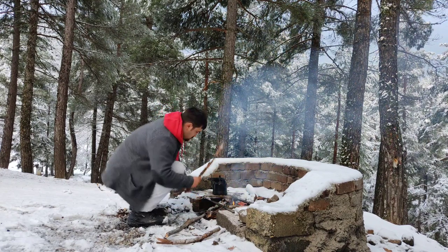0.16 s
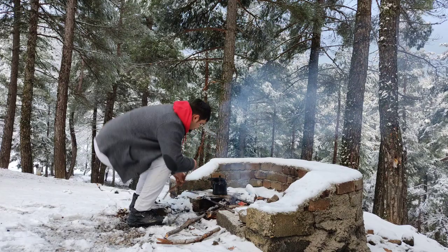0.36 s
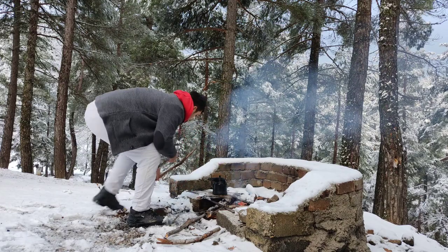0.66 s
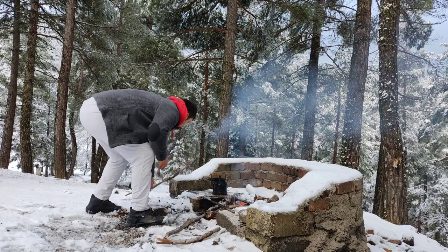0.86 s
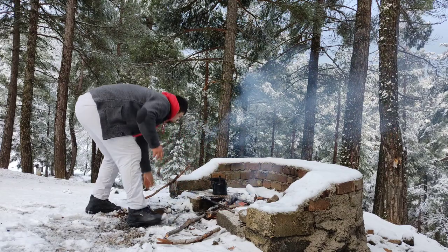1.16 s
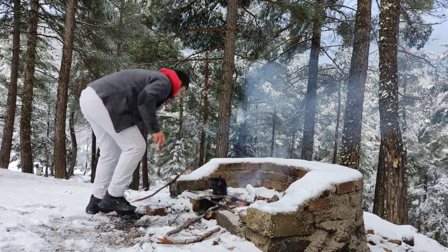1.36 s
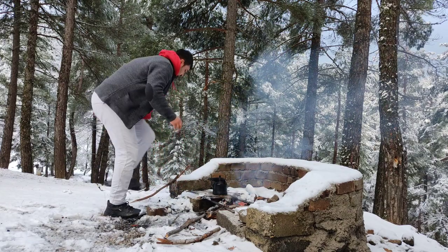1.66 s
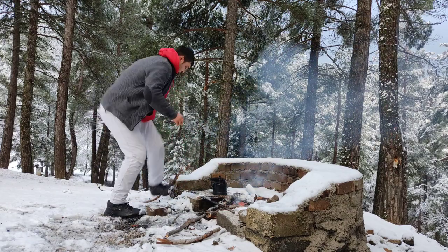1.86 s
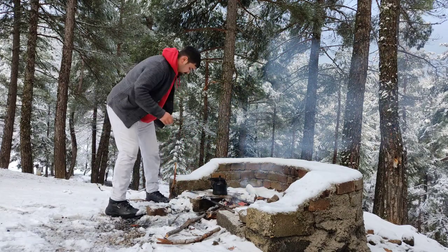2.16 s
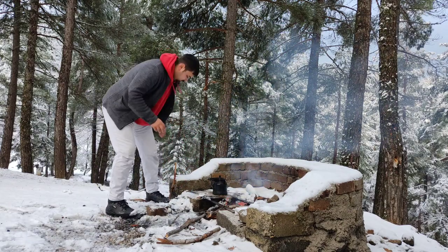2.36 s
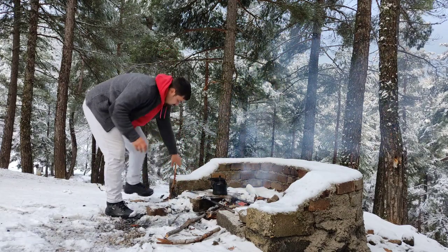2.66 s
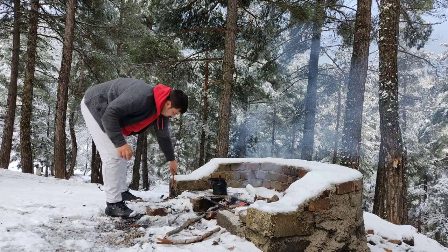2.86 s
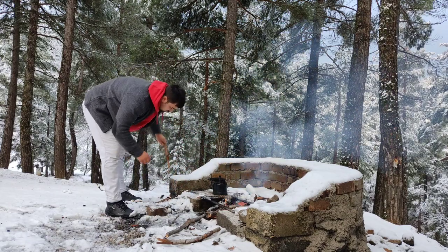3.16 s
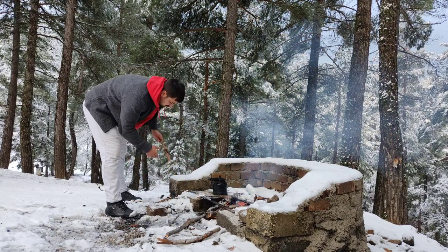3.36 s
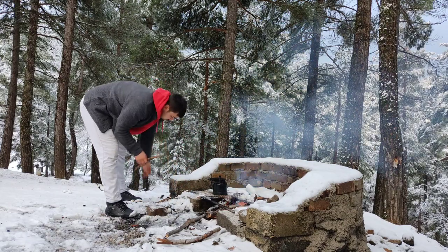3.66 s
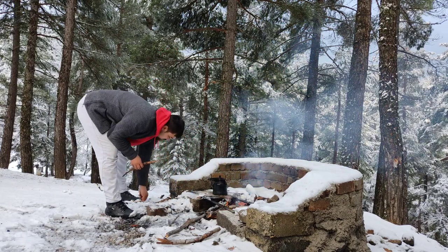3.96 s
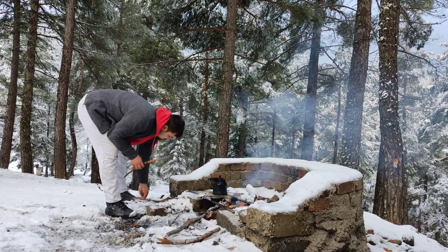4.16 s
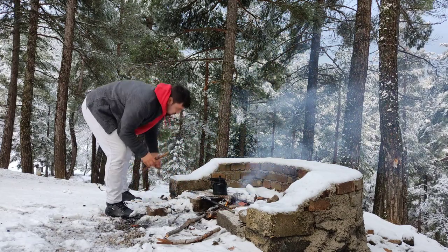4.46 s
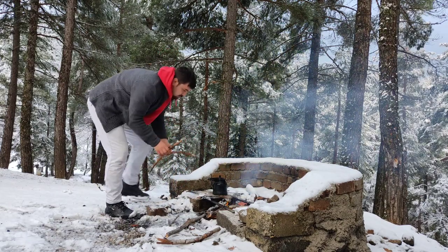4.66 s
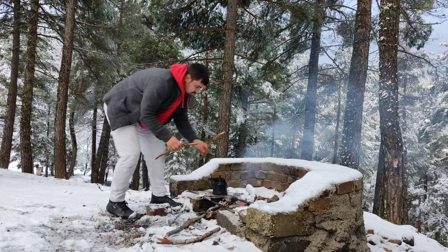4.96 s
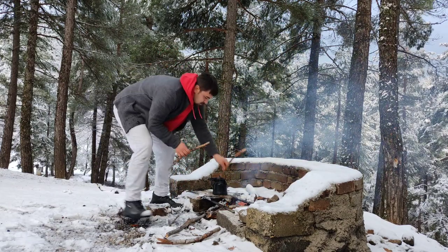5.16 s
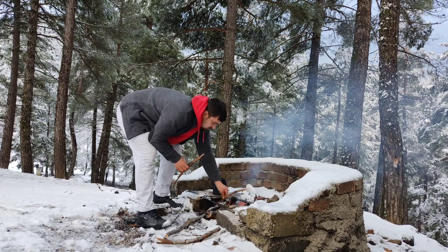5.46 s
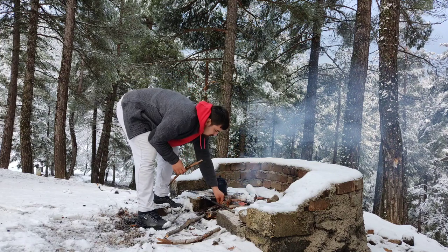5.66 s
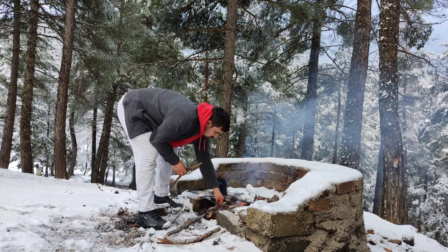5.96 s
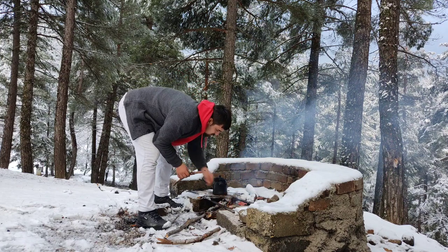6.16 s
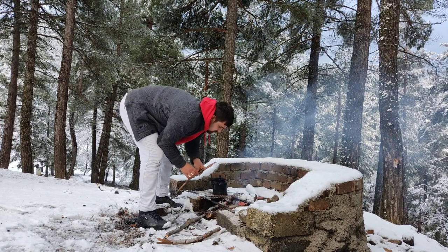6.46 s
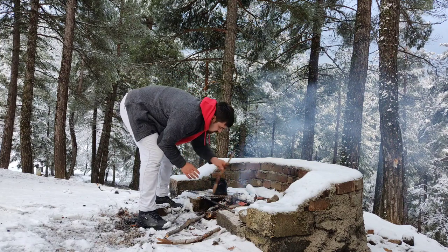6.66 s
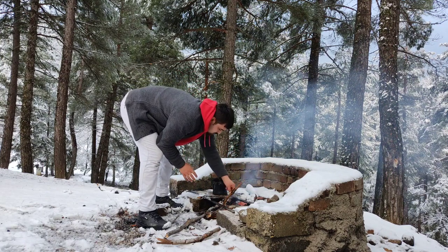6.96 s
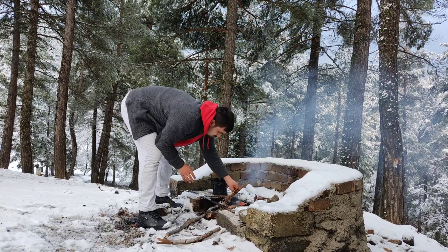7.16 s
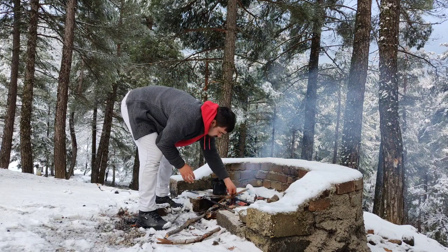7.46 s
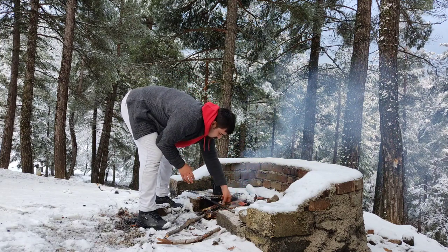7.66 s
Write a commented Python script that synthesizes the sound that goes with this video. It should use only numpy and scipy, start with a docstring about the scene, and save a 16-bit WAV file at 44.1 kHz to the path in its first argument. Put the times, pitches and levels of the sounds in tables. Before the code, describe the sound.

A quiet outdoor stereo phone pickup with slight wind and hiss. Someone shifts in crunchy snow, cloth rubbing, and handles wood: light taps, dull thuds and tiny bright clicks build to one explosive branch crack near two seconds, scattering splinters. It calms, with drips and a crisp snap at four and a half, then a cluster of thuds and scrapes from five, and finally sparse taps and ticks.

```python
"""Someone gathers sticks beside a small fire in a snowy pine wood, heard by a phone's two microphones.
Sticks tap and scrape, twigs click, and one dry branch cracks: short bursts of pulses, coloured by filters.
Boots crunch in the snow: swelling clusters of tiny slips. Dull thuds are soft pitched pushes. A jacket rubs.
Melting snow drips as tones that climb in pitch over a ringing hollow; embers tick as sparse filtered pulses.
Filtered noise makes a quiet hiss and a slight wind, and random echoes make the trees around."""
import sys
import numpy as np
from scipy import signal
from scipy.fft import rfft, irfft
from scipy.io import wavfile

SR = 44100
rng = np.random.default_rng(int(sys.argv[2]) if len(sys.argv) > 2 else 0)


def dump_mix(stems):
    """Bounce the given channels to the path in sys.argv[1] as a 16-bit WAV at rate SR."""
    frames = np.atleast_2d(stems).T  # one column per channel
    limited = np.clip(frames, -1, 1)  # hard clip at full scale
    pcm = np.round(limited * 32767).astype(np.int16)
    wavfile.write(sys.argv[1], SR, pcm)


N = 343980
TIME = np.arange(N) / SR  # seconds

# Levels in the tables and settings are those before tone filters, echoes and microphones.
# quiet hiss and slight wind, tone of each: (frequency [Hz], level [dB])
HISS_TONE = [(40, -29), (207, -11), (309, -20.5), (420, -15.5), (691, -29), (1030, -28), (1400, -29.5),
             (4040, -27.5), (6000, -31), (7680, -20), (9100, -30), (9700, -40), (12600, -41.5),
             (13300, -69.5)]
WIND_TONE = [(8, -2.5), (25, -17.5), (70, -20), (150, -31.5), (600, -54), (3000, -93.5)]
HISS_DB, WIND_DB = -67.5, -61

# embers: ticks per second and their middle level
EMBER_RATE, EMBER_DB = 24, -57
# jacket: level, middle pitch, and how far the rubbing swings
JACKET_DB, JACKET_HZ, JACKET_SWING_DB = -73, 650, 5

# the loudest drips of melting snow: (time [s], level [dB], starting pitch [Hz], decay [ms])
DRIPS = [(0.011, -56, 610, 13), (0.455, -45, 266, 27.6), (2.916, -52, 312, 18), (3.01, -54, 402, 27),
         (3.076, -55, 905, 13), (3.255, -50, 297, 16.7), (3.622, -49, 313, 26.7), (3.735, -62, 966, 20),
         (4.08, -61.5, 392, 37), (4.416, -55, 398, 18), (4.485, -54.5, 306, 14), (4.524, -54, 341, 9),
         (4.66, -57, 610, 12.5), (4.729, -57.5, 394, 18), (5.761, -51.5, 290, 28), (5.813, -53.5, 383, 6.9),
         (6.343, -53, 323, 11), (6.538, -58.5, 390, 11.4), (6.74, -48, 393, 14), (6.829, -56.5, 906, 15.4),
         (6.853, -46, 373, 10.5), (6.892, -57.5, 392, 12), (7.115, -57, 389.7, 10.7),
         (7.158, -55.5, 772, 16), (7.524, -55.5, 386, 9.7), (7.726, -46.5, 314, 18)]
# tones that ring in the hollow under the drips: (pitch [Hz], level [dB], time to fade by 60 dB [s])
HOLLOW_TONES = [(198, -6.5, .2), (428.3, 0.5, 0.1), (611, 2, .1), (1020.5, -1, 0.09)]
DRIP_RISE_MS, DRIP_CLIMB_HZ_PER_S, DRIP_SPLASH_DB = 2, 4000, -7
# the fainter drops: least level and its range, lowest pitch and its range
DROP_DB, DROP_RANGE_DB, DROP_LOW_HZ, DROP_RANGE_HZ = -66.5, 4.5, 316, 756

# sticks tap against each other: (time [s], level [dB], pitch [Hz])
STICK_TAPS = [(.012, -58, 1050), (0.146, -61, 1224), (.292, -57, 1000), (0.505, -50.5, 1040),
              (.581, -50, 1060), (1.12, -50, 1053), (1.285, -54, 1150), (2.927, -58.5, 1100),
              (3.305, -55, 1090), (3.996, -56.5, 1367), (4.733, -59, 1115), (4.775, -55.5, 1080),
              (5.373, -57.5, 1115), (5.639, -57.5, 1201), (6.056, -53.5, 1105), (6.22, -51, 1076),
              (6.327, -63, 1094), (6.555, -57.5, 1175), (6.787, -56, 1336), (6.865, -59, 1057),
              (7.161, -56, 1100), (7.294, -62, 1140), (7.379, -54.5, 996), (7.734, -52.5, 1690)]
# chatter of the contact, time for the stick's ring to fade by 60 dB, its level, and the broad knock under it
TAP_CONTACT_MS, TAP_T60_S, TAP_RING_DB, TAP_KNOCK_DB = 5, .04, 0, -3

# the loudest twigs: (time [s], level [dB], woody part against it [dB], left minus right [dB])
TWIG_CLICKS = [(0.2633, -50.5, -24, 3), (0.487, -49.5, -30, 2), (.511, -49.5, -15, 10),
               (0.84, -40.5, -18, -6), (1.0815, -41, -20, 11), (1.208, -50, -29, -3),
               (1.426, -49.5, -20, 0), (1.506, -47.5, -33, -3), (1.571, -37, -14, -2), (1.577, -41, -15, 6),
               (1.77, -43.5, -14, 1), (1.903, -53, -20, 4), (1.945, -49.5, -24, 2), (2.0085, -34.5, 0, 3),
               (2.043, -28.5, -23, -9), (2.075, -20, -9, 2), (2.093, -35, -12.5, 1), (2.326, -40, -24, 7),
               (2.3335, -42, -22, -1), (2.345, -40, -24.5, -11), (2.3984, -50, -17, 3),
               (2.536, -57, -22, 3), (2.6602, -49, -32, 3.5), (2.8891, -46, -27, 7.5),
               (3.318, -55.5, -24, 4), (3.396, -65, 8.5, -5.5), (3.604, -55, -22.5, 1),
               (4.116, -61, -17, -4), (4.4808, -47, -16, -2), (4.5509, -32, -12, -1),
               (4.5536, -36, -6.5, -3.5), (4.6587, -42, -9, 3), (4.791, -50, -6, -2.5),
               (4.963, -55, -23, 3), (4.981, -51, -18, 3), (5.035, -53, -15, -1), (5.176, -45.5, -12, 2.5),
               (5.235, -35, -15.5, 4), (5.26, -51, -18, 0), (5.305, -48, -24, -4), (5.455, -41, -13, -13),
               (5.502, -50.5, 7.5, -9), (5.57, -51, -5, 7), (5.883, -54, -29, -9), (5.9698, -52, -30, -10),
               (6.216, -43, -15, -4), (6.8756, -50.5, -8, -12), (7.0382, -37.5, -28, 8),
               (7.051, -40, -16, -13), (7.203, -54.5, -11, 0), (7.42, -54.5, -4.5, -4),
               (7.728, -44.5, -21, 10)]
# bright and woody tone of small breaks: (frequency [Hz], level [dB])
TWIG_TONE = [(500, -30.5), (3500, -11.5), (5600, -4), (7800, -4), (9000, -9), (9800, -16), (15000, -26.5)]
WOODY_TONE = [(150, -4), (700, -3), (1800, -4), (2600, 2), (4000, -20.5), (7000, -20), (15000, -53.5)]
# thin twigs break alike: pitch, its relative scatter, decay
TWIG_HZ, TWIG_SPREAD, TWIG_MS = 7263, 0.033, 4
# the fainter twigs: top level, range below it, woody part, widest pan
FAINT_TWIG_DB, FAINT_RANGE_DB, FAINT_WOOD_DB, FAINT_PAN_DB = -55.5, 8, -15, -2
TWIG_ECHO_T60_S = .11  # the near echoes of a twig die quickly

# dull thuds and the low body of the louder cracks: (time [s], level [dB], pitch [Hz])
DULL_THUDS = [(0.286, -49, 280), (0.851, -48.5, 453), (1.089, -50, 204), (1.2567, -37, 450),
              (1.263, -38.5, 216), (1.352, -44, 431), (1.398, -43.5, 585), (1.586, -46, 187),
              (1.59, -35, 474), (1.657, -52, 422), (1.748, -54, 347.4), (2.009, -25, 514),
              (2.016, -39, 101), (2.064, -23.5, 375), (2.066, -24.5, 230), (2.063, -37.5, 35.8),
              (2.16, -35, 556), (2.173, -39.5, 300), (2.303, -44.5, 610), (2.485, -46.5, 524),
              (2.59, -50, 202), (3.02, -52, 402), (3.154, -46, 420), (3.157, -44, 231),
              (3.205, -47.5, 330.5), (3.259, -50, 365), (3.629, -50.5, 369), (4.553, -33, 1500),
              (4.661, -45.5, 900), (5.049, -39.5, 516), (5.085, -37, 616), (5.092, -45.5, 170),
              (5.104, -56, 890), (5.161, -35, 570), (5.457, -37.5, 431), (5.461, -40, 185),
              (5.485, -56, 521), (5.504, -41, 509), (5.573, -46, 1000), (5.586, -47, 400),
              (5.632, -56, 397), (5.697, -52.5, 252)]
# decay at that pitch; deeper thuds crumble longer, by this power
CRUMBLE_MS, CRUMBLE_HZ, CRUMBLE_POWER = 15, 245.5, 0.553

# weight comes down on the snow at once: (time [s], level [dB])
BOOT_STAMPS = [(1.58, -42), (2.01, -34.5), (2.166, -46.5), (5.159, -48), (5.456, -49), (5.504, -52)]
# boots and sticks slide through snow: (time of the height [s], length [s], packing [dB], crust [dB])
SNOW_SCUFFS = [(0.395, 0.13, -72, -70.5), (0.692, 0.18, -53.5, -69.5), (0.838, 0.057, -57, -56.5),
               (0.922, 0.099, -54.5, -61), (1.075, 0.017, -68, -52), (1.215, 0.03, -58.5, -56),
               (1.375, 0.067, -43.5, -53), (1.516, 0.027, -78, -59), (1.58, 0.01, -55, -34),
               (1.656, 0.15, -43, -58), (2.021, 0.028, -50, -51), (2.327, 0.11, -61, -56.5),
               (2.491, 0.063, -52.5, -64), (2.594, 0.13, -49.5, -59.5), (3.031, 0.72, -65.5, -72),
               (3.228, 0.089, -56.5, -77), (5.109, 0.098, -46, -54), (5.215, 0.084, -71.5, -53),
               (7.098, 0.095, -58.5, -61.5)]
# tone of the icy crust and of the packing snow below: (frequency [Hz], level [dB])
CRUST_TONE = [(200, -22), (1000, -14), (2200, -13.5), (3100, -11.5), (4500, -12), (6000, -5.5), (7600, 0.5),
              (8900, -8.5), (9700, -13), (15500, -28)]
PACKING_TONE = [(40, -15.5), (110, -20), (190, 0.5), (400, -1), (600, -5), (800, -7), (1100, -20.5),
                (2000, -16.5), (4000, -36.5)]
SCUFF_RISE_SHARE = 0.5  # of the length; the rest is the fall
STAMP_RISE_S, STAMP_FALL_S, STAMP_CRUST_DB = .004, 0.032, -5

# sticks scrape over each other: (time of the height [s], length [s], level [dB])
STICK_SCRAPES = [(0.397, 0.058, -60.5), (0.635, 0.034, -60.5), (0.932, 0.033, -64), (1.362, 0.05, -67.5),
                 (1.644, 0.11, -58.5), (5.054, 0.021, -55), (5.093, .07, -54), (5.163, .02, -54),
                 (5.203, 0.045, -62), (5.483, 0.027, -53.5), (5.552, 0.078, -59), (5.576, .016, -50),
                 (5.586, 0.026, -55), (7.205, 0.13, -72.5)]
# tone of bark on bark: (frequency [Hz], level [dB])
SCRAPE_TONE = [(200, -17), (500, -3.5), (1100, -2), (1600, -11), (2300, -2.5), (3000, -13), (6000, -17.5),
               (10000, -31.5), (15000, -44.5)]
SCRAPE_SLIPS_PER_S, SCRAPE_SPREAD_DB = 610, 5

# tone of the breaking branch: (frequency [Hz], level [dB])
BRANCH_TONE = [(60, -19.5), (120, -18.5), (200, -10), (600, -10.5), (1300, -12), (2500, -14.5), (3500, -5),
               (4400, -11.5), (5500, -6.5), (7200, -1), (8400, 2.5), (9500, -13.5), (12600, -15.5),
               (15500, -24.5)]
# narrow bright tones that colour the crack as it fades: (pitch [Hz], level [dB], time to fade by 60 dB [s])
BRIGHT_TONES = [(2966, -8, .25), (3400, -5, .3), (6255, -3, .14), (6850, 0, .2), (7430, -1, .2),
                (8050, 2, .25), (8705, -2, .13)]
BRANCH_S, BRANCH_DB, SPLINTER_DB, BRIGHT_TONES_DB = 2.0631, -3, -16.5, -7.5
# bits of bark fly off the break
DEBRIS_PER_S, DEBRIS_SPREAD_DB = 300, 3.5
DEBRIS_DB, DEBRIS_RISE_S, DEBRIS_FALL_S = -34, .004, .075

# the two microphones differ: (frequency [Hz], left minus right [dB])
MIC_BALANCE = [(40, -7), (130, 9.5), (300, 7), (550, 6.5), (1000, 3.5), (2000, 1.5), (3500, 0.5),
               (6000, -6), (8000, -1.5), (12000, -0.5)]
TOP_HZ = 15700  # the microphones pass nothing much above this


def undb(db):
    """Turn decibels into a gain."""
    return 10 ** (np.asarray(db) / 20)


def unit(x):
    """Scale to an average (rms) level of 1."""
    return x / np.sqrt(np.mean(x ** 2))


def add(track, s, sound):
    """Mix a sound into a track at time s."""
    i = int(s * SR)
    track[..., i:i + sound.shape[-1]] += sound[..., :N - i]


def sides(pan_db):
    """Gains for left and right that differ by pan_db."""
    return undb(np.array([[pan_db], [-pan_db]]) / 2)


def points_to_db(points, size):
    """Join (Hz, dB) points by straight lines over the logarithm of frequency."""
    hz, db = np.transpose(points)
    return np.interp(np.log(np.fft.rfftfreq(size, 1 / SR) + 1), np.log(hz), db)


def colour(x, tone, size=4096):
    """Filter through (Hz, dB) points, keeping the power of white noise."""
    gain = undb(points_to_db(tone, size))
    # folding the cepstrum forward lets the filter answer only after its input
    cepstrum = irfft(np.log(gain))
    cepstrum[1:size // 2] *= 2
    cepstrum[size // 2 + 1:] = 0
    response = irfft(np.exp(rfft(cepstrum)))
    response /= np.linalg.norm(response)
    return signal.oaconvolve(x, response[None], axes=1)[:, :x.shape[1]]


def band(x, hz, ratio, order=2):
    """Keep the pitches from hz / ratio to hz * ratio."""
    edges = [hz / ratio, min(hz * ratio, SR / 2 - 1)]
    return signal.sosfilt(signal.butter(order, edges, "band", fs=SR, output="sos"), x)


def walk(rate):
    """Wander at random around zero, with this many random values a second joined by lines."""
    knots = rng.standard_normal(int(N / SR * rate) + 2)
    return np.interp(TIME * rate, np.arange(len(knots)), knots)


def grains(rate, spread_db, size):
    """Tiny fractures: single pulses at random moments, of very unequal strength."""
    hit = rng.random(size) < rate / SR
    strength = np.clip(rng.standard_normal(size), -2, 2)
    return hit * undb(spread_db * strength) * rng.choice([-1, 1], size)


def scattered(count, size):
    """Rows of a random moment in each equal slice of time, then further chances from 0 to 1."""
    rows = rng.random((count, size))
    rows[:, 0] = (np.arange(count) + rows[:, 0]) * N / SR / count
    return rows


def swell(s, rise, fall):
    """Pressure builds until time s, then dies away."""
    return np.exp(-(np.minimum(TIME - s, 0) / rise) ** 2 - np.maximum(TIME - s, 0) / fall)


def ring(x, modes):
    """Let x strike decaying tones; each has its dB as gain at its own pitch."""
    total = 0
    for hz, db, t60 in modes:
        pole = np.exp((2j * np.pi * hz - np.log(1000) / t60) / SR)
        total = total + 2 * (1 - abs(pole)) * undb(db) * signal.lfilter([1], [1, -pole], x).real
    return total


def diffuse(pair, alike_hz=650):
    """Sound from all around: the same bass at both microphones, unrelated treble."""
    alike = 1 / (1 + (np.fft.rfftfreq(pair.shape[1], 1 / SR) / alike_hz) ** 2)
    mid, side = rfft(pair) * np.sqrt([1 + alike, 1 - alike])
    return irfft(np.array([mid + side, mid - side]), pair.shape[1]) / np.sqrt(2)


def ports(x, pan_db=0, scatter_db=-4, count=6, size=256):
    """Sound from one side reaches the left microphone count samples late; the ground scatters it briefly."""
    response = diffuse(rng.standard_normal((2, size)) * np.exp(-TIME[:size] / 0.0006))
    phase = np.exp(1j * np.angle(rfft(response, 2 * size)))  # smears without adding its own tone
    treble = 1 - np.exp(-np.fft.rfftfreq(2 * size, 1 / SR) / 2500)  # bass is scattered less
    response = undb(scatter_db) * irfft(phase * treble)[:, :size]
    response[0, count] += undb(pan_db / 2)
    response[1, 0] += undb(-pan_db / 2)
    response *= np.sqrt(2) / np.linalg.norm(response)
    return signal.oaconvolve(x[None], response, axes=1)[:, :len(x)]


def forest(x, wet_db, near_t60=0.064, far_t60=0.57, far_db=-14):
    """Add the echoes of ground and near trunks, then a thin tail from the far trees."""
    t = TIME[:SR]
    fade = undb(-60 * t / near_t60) + undb(far_db - 60 * t / far_t60)
    onset = 1 - np.exp(-t / 0.0003)
    echoes = diffuse(np.array([grains(3000, 4.8, SR) for _ in x]) * fade * onset)
    # snow and needles swallow the top
    echoes = signal.sosfilt(signal.butter(3, 9500, fs=SR, output="sos"), echoes)
    echoes /= np.linalg.norm(echoes, axis=1, keepdims=True)
    return x + undb(wet_db) * signal.fftconvolve(x, echoes, axes=1)[:, :N]


def fracture(ms, size=2048):
    """Fibres part in a quick, dying run of pulses."""
    fade = np.exp(-TIME[:size] * 1000 / ms)
    run = grains(20000, 4.8, size) * fade
    return run * np.linalg.norm(fade) / np.linalg.norm(run)


def blow(hz, ms, ratio, crumble_db=-4, size=8192):
    """A soft push around one pitch, with peak 1, and crumbling at crumble_db."""
    sources = np.array([signal.unit_impulse(size), fracture(ms, size)])
    push, crumble = band(sources, hz, ratio, order=3)
    return push / np.abs(push).max() + undb(crumble_db) * crumble / np.abs(crumble).max()


def air(pan_db=-1.0):
    """Quiet hiss that stirs a little, over the surging rumble of a light wind."""
    hiss = colour(diffuse(rng.standard_normal((2, N)), alike_hz=439.4), HISS_TONE) * sides(pan_db)
    rumble = colour(diffuse(rng.standard_normal((2, N)), alike_hz=44.94), WIND_TONE)
    stir = undb(1.6 * walk(26))
    surge = undb(2 * walk(3.0))
    return undb(HISS_DB) * unit(hiss * stir) + undb(WIND_DB) * unit(rumble * surge)


def embers():
    """The fire ticks faintly: sparse pulses with a bright and a woody tone."""
    ticks = ports(grains(EMBER_RATE, 4, N) * undb(EMBER_DB), scatter_db=-3)
    return forest(colour(ticks, TWIG_TONE) + undb(-2.5) * colour(ticks, WOODY_TONE), wet_db=6)


def jacket():
    """Heavy cloth folds and rubs softly, now more and now less."""
    folds = band(unit(grains(900, 4, N)), JACKET_HZ, ratio=1.9)
    folds = folds * undb(JACKET_SWING_DB * walk(14))
    return forest(ports(undb(JACKET_DB) * unit(folds)), wet_db=-8.5)


def drip(hz, ms, size=8192):
    """A small wet splash, and a bubble whose pitch climbs as it fades."""
    t = TIME[:size]
    fade = (1 - np.exp(-t * 1000 / DRIP_RISE_MS)) * np.exp(-t * 1000 / ms)
    phase = 2 * np.pi * np.cumsum(hz + DRIP_CLIMB_HZ_PER_S * t) / SR
    bubble = np.sin(phase) * fade / fade.max()
    return bubble + undb(DRIP_SPLASH_DB) * blow(hz, ms, ratio=1.67, crumble_db=8, size=size)


def thaw(count=110):
    """Meltwater drips into a hollow that rings briefly; fainter, duller drops fall between."""
    drops = np.zeros(N)
    for s, db, hz, ms in DRIPS:
        add(drops, s, undb(db) * drip(hz, ms))
    for s, size, pitch in scattered(count, size=3):
        # squaring the chances makes most of them small and low
        hz = DROP_LOW_HZ + DROP_RANGE_HZ * pitch ** 2
        level = undb(DROP_DB + DROP_RANGE_DB * size ** 2)
        add(drops, s, level * blow(hz, ms=36, ratio=2.8, crumble_db=4.5))
    finest = undb(-63) * grains(600, 3.5, N) * undb(2.5 * walk(9))  # these keep the hollow sounding
    sound = undb(-8.5) * drops + undb(1) * ring(drops + finest, HOLLOW_TONES)
    # it lies on the other side of the phone, so the microphones swap
    return forest(ports(sound, pan_db=2.2, count=7)[::-1], wet_db=-7.5)


def taps():
    """Damp sticks touch: a soft knock whose chatter rings the stick for a moment."""
    out = np.zeros(N)
    for s, db, hz in STICK_TAPS:
        tone = ring(fracture(TAP_CONTACT_MS, size=4096), [(hz, 0, TAP_T60_S)])
        tone = undb(TAP_RING_DB) * tone / np.abs(tone).max()
        knock = undb(TAP_KNOCK_DB) * blow(hz, TAP_CONTACT_MS, ratio=1.6, crumble_db=3, size=4096)
        add(out, s, undb(db) * (tone + knock))
    return forest(ports(out, pan_db=-0.5, count=6), wet_db=-7.5)


def twigs(count=16):
    """Small bright breaks, with more or less wood in their tone; fainter ones fall at random between."""
    tip, wood = np.zeros((2, 2, N))
    faint = [(s, FAINT_TWIG_DB - FAINT_RANGE_DB * weak, FAINT_WOOD_DB, FAINT_PAN_DB * (2 * side - 1))
             for s, weak, side in scattered(count, size=3)]
    for s, db, wood_db, pan_db in TWIG_CLICKS + faint:
        lag = rng.integers(3, 8)  # samples between the microphones
        hz = TWIG_HZ * np.exp(TWIG_SPREAD * rng.standard_normal())
        click = ports(fracture(TWIG_MS), pan_db, scatter_db=5.0, count=lag) * undb(db)
        add(tip, s, undb(4.5) * click + band(click, hz, ratio=1.2))
        add(wood, s, click * undb(wood_db))
    sound = undb(-7.5) * colour(tip, TWIG_TONE) + undb(1.0) * colour(wood, WOODY_TONE)
    return forest(sound, wet_db=-7.0, near_t60=TWIG_ECHO_T60_S, far_db=-22.5)


def thuds():
    """Dull thuds and the low body of the louder cracks; the deeper they are, the longer they crumble."""
    out = np.zeros(N)
    for s, db, hz in DULL_THUDS:
        ms = CRUMBLE_MS * (CRUMBLE_HZ / hz) ** CRUMBLE_POWER
        add(out, s, undb(db) * blow(hz, ms, ratio=1.46))
    return forest(ports(out, pan_db=-5.0, count=7), wet_db=-12.0)


def boots():
    """The icy crust crackles while the snow under it packs in coarser slips; stamps start fast, scuffs swell."""
    packing, crust = np.zeros((2, N))  # power over time
    stamps = [(s, STAMP_RISE_S, STAMP_FALL_S, db, db + STAMP_CRUST_DB) for s, db in BOOT_STAMPS]
    scuffs = [(s, SCUFF_RISE_SHARE * length, (1 - SCUFF_RISE_SHARE) * length, *levels)
              for s, length, *levels in SNOW_SCUFFS]
    for s, rise, fall, packing_db, crust_db in stamps + scuffs:
        weight = swell(s, rise, fall)
        packing += (weight * undb(packing_db)) ** 2
        crust += (weight * undb(crust_db)) ** 2
    jerks = undb(2.2 * walk(160))  # the snow yields in fits and starts
    coarse = unit(grains(900, 6, N) * jerks)
    slips = colour(ports(coarse * np.sqrt(packing), pan_db=-2.5), PACKING_TONE)
    fine = unit(grains(1300, 6, N) * jerks)
    crackle = colour(ports(fine * np.sqrt(crust), scatter_db=-7.0), CRUST_TONE)
    return forest(undb(-4.5) * slips, wet_db=-7.5) + forest(undb(0.5) * crackle, wet_db=-1.0)


def scrapes():
    """Bark catches and slips on bark, in short clusters."""
    power = sum((undb(db) * swell(s, length / 2, length / 2)) ** 2 for s, length, db in STICK_SCRAPES)
    slips = unit(grains(SCRAPE_SLIPS_PER_S, SCRAPE_SPREAD_DB, N) * undb(3 * walk(150)))
    return forest(colour(ports(slips * np.sqrt(power), pan_db=-3.5), SCRAPE_TONE), wet_db=-9.5)


def branch(pan_db=4):
    """The dry branch gives way all at once; bright tones colour its fade, and splinters tear on for a moment."""
    crack = np.zeros((2, N))
    add(crack, BRANCH_S, undb(BRANCH_DB) * ports(fracture(ms=1.1), scatter_db=1.5, count=5))
    splinters = diffuse(np.array([fracture(ms=22.0, size=8192) for _ in crack]))
    add(crack, BRANCH_S, undb(SPLINTER_DB) * splinters)
    crack = crack + undb(BRIGHT_TONES_DB) * ring(crack, BRIGHT_TONES)
    sound = forest(colour(crack, BRANCH_TONE), wet_db=-14, near_t60=0.14, far_t60=0.8, far_db=-12.5)
    treble = signal.sosfilt(signal.butter(1, 3500, "high", fs=SR, output="sos"), sound)
    return sound + (sides(pan_db) - 1) * treble  # the phone's body shades only the treble


def debris():
    """Splinters and bits of bark snap off one by one around the break, then ever weaker."""
    bits = unit(grains(DEBRIS_PER_S, DEBRIS_SPREAD_DB, N))
    bits = bits * swell(BRANCH_S, DEBRIS_RISE_S, DEBRIS_FALL_S)
    return forest(undb(DEBRIS_DB) * colour(ports(bits, scatter_db=0), TWIG_TONE), wet_db=-9)


def scene():
    """Everything in the clearing, added together."""
    sticks = branch() + debris() + twigs() + taps() + scrapes()
    moves = boots() + jacket() + thuds()
    background = thaw() + embers() + air()
    return sticks + moves + background


def record(dry):
    """The phone's two microphones differ in tone; the sound clips at full scale and loses its top."""
    balance_db = points_to_db(MIC_BALANCE, N)
    heard = irfft(rfft(dry) * undb(np.array([balance_db, -balance_db]) / 2), N)
    top_cut = signal.ellip(8, .2, 70, TOP_HZ, fs=SR, output="sos")
    return signal.sosfilt(top_cut, np.clip(heard, -1, 1))


dry = scene()
out = record(dry)
dump_mix(out)
```